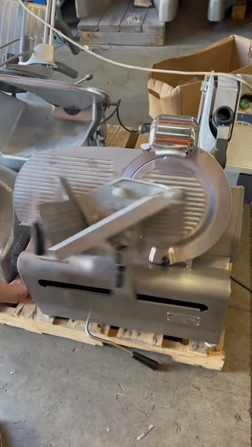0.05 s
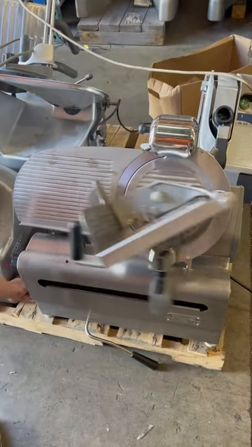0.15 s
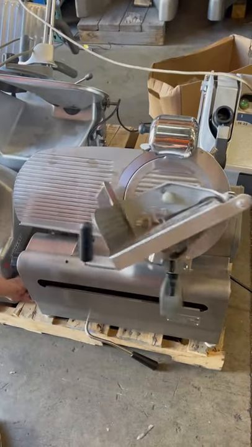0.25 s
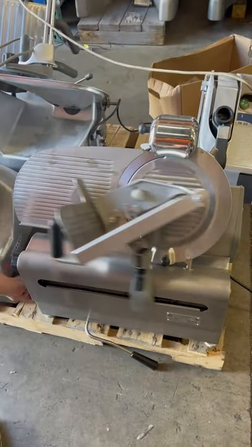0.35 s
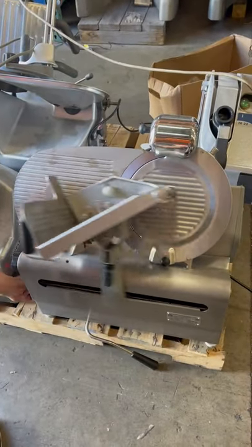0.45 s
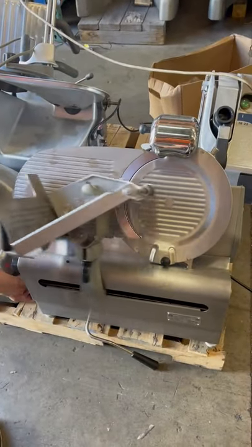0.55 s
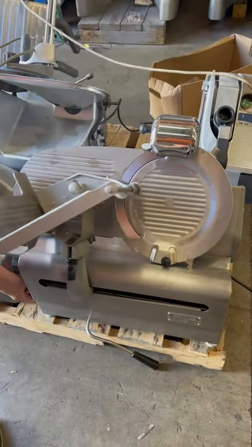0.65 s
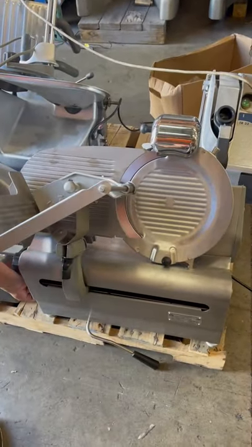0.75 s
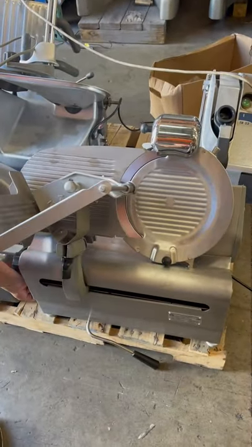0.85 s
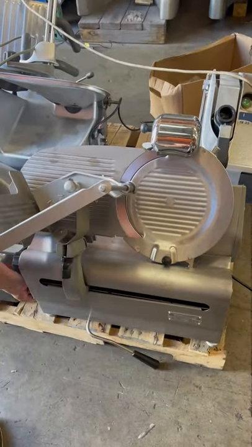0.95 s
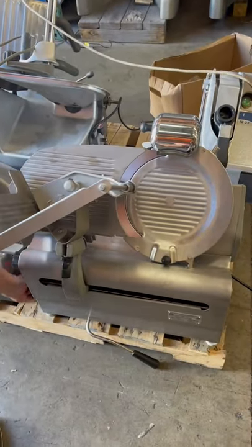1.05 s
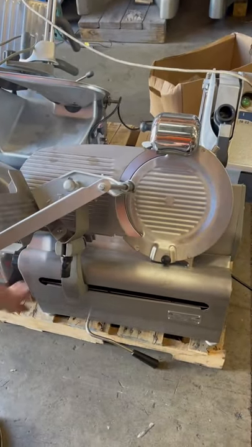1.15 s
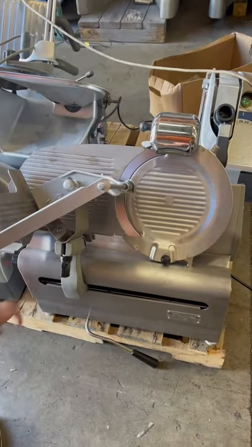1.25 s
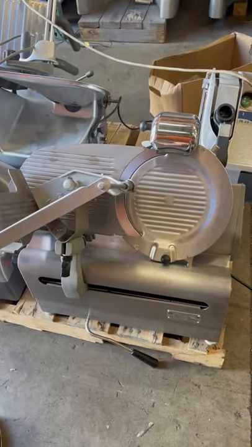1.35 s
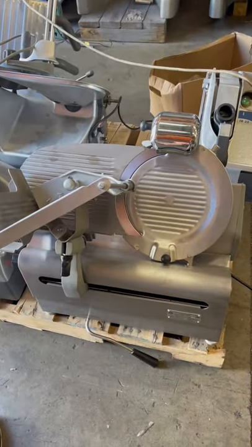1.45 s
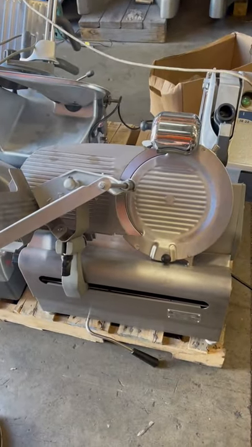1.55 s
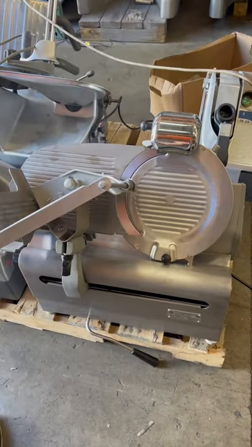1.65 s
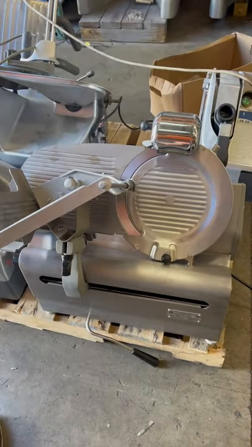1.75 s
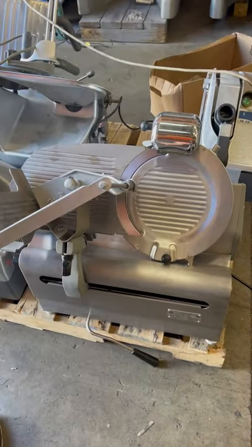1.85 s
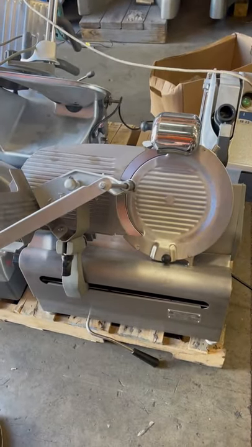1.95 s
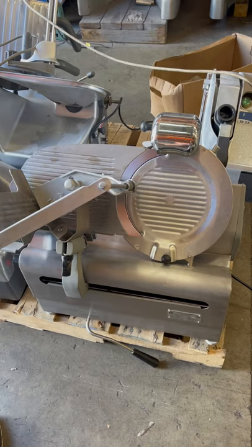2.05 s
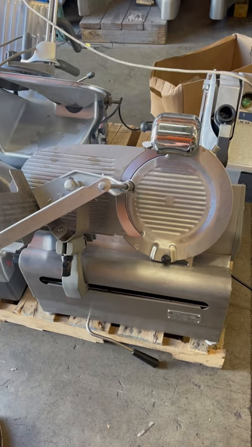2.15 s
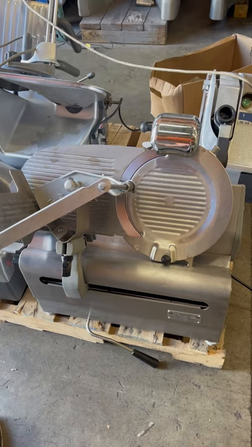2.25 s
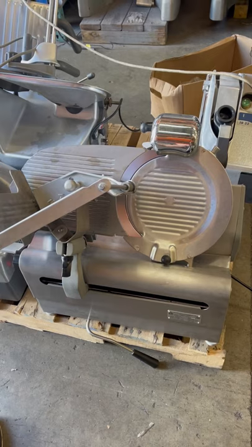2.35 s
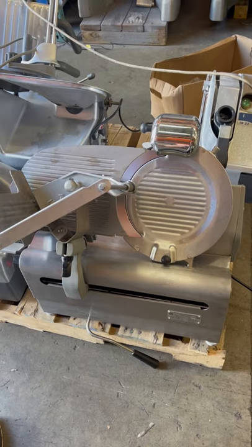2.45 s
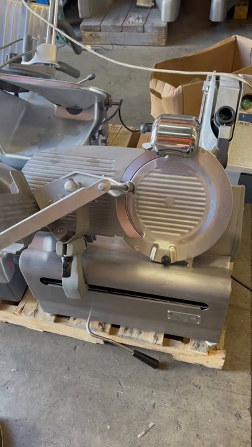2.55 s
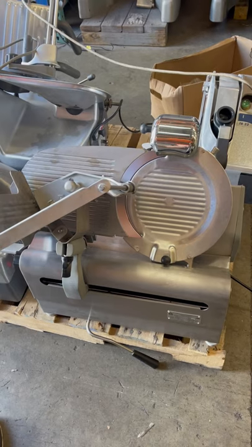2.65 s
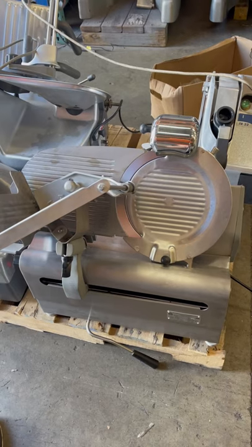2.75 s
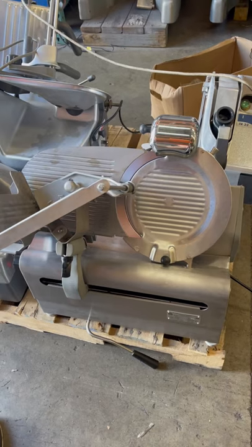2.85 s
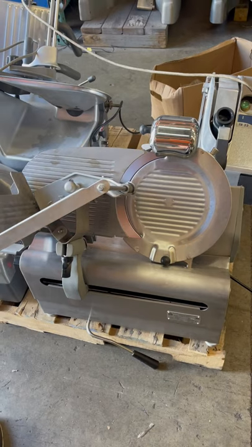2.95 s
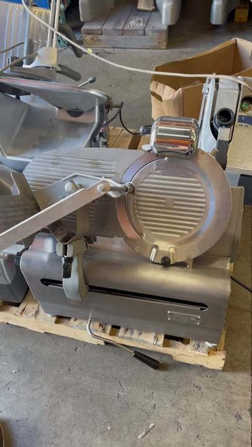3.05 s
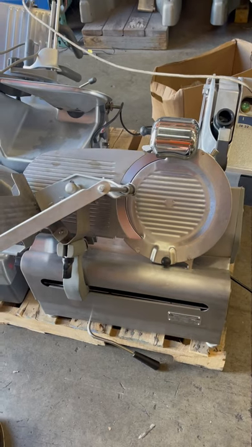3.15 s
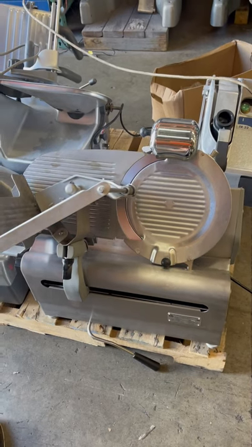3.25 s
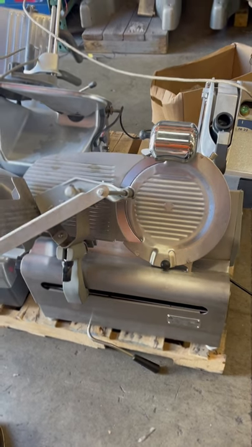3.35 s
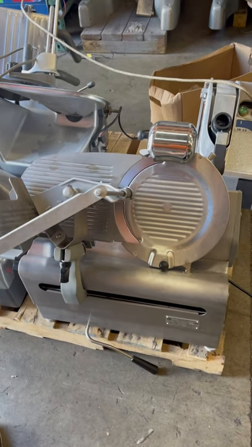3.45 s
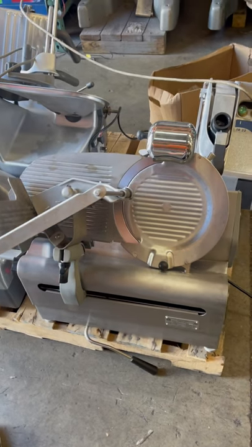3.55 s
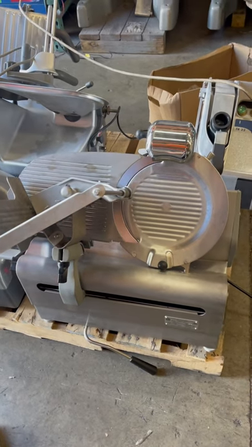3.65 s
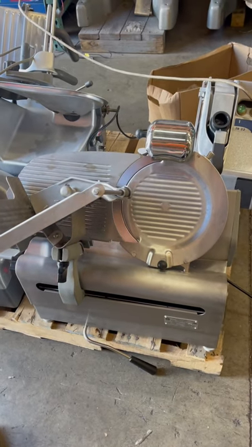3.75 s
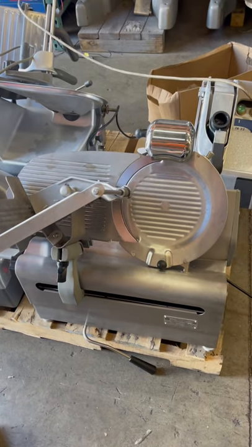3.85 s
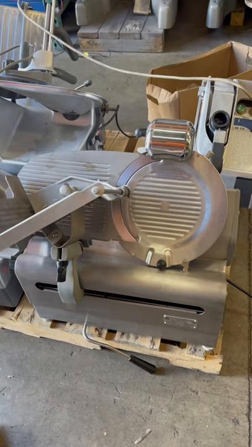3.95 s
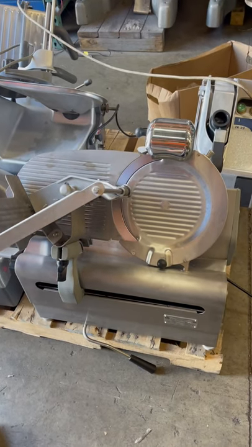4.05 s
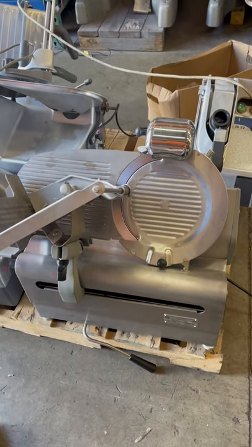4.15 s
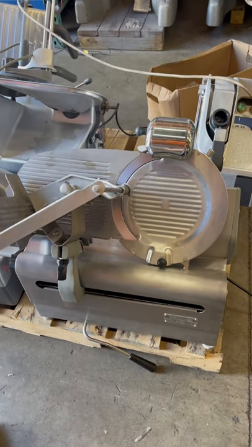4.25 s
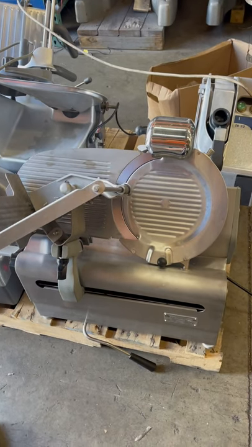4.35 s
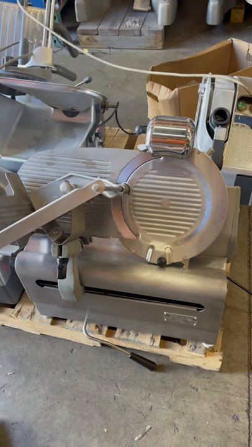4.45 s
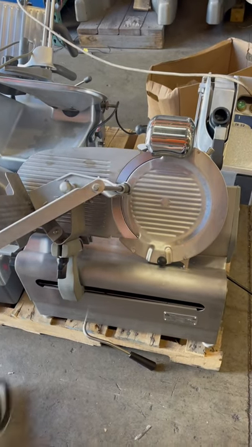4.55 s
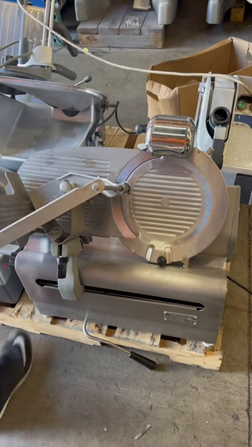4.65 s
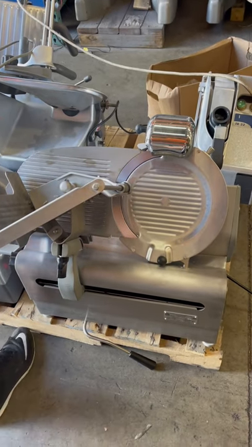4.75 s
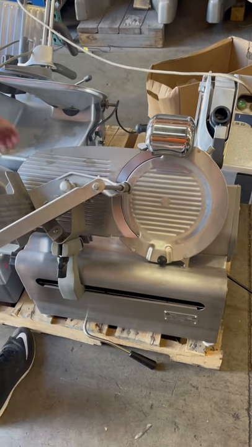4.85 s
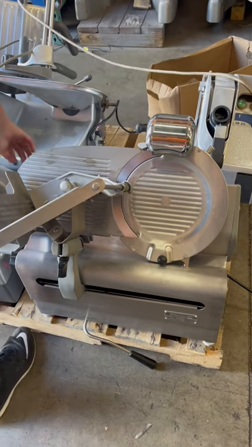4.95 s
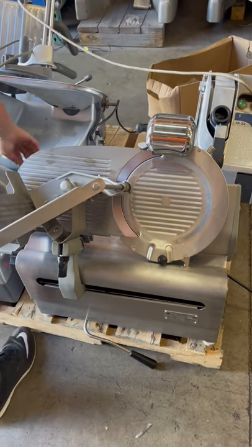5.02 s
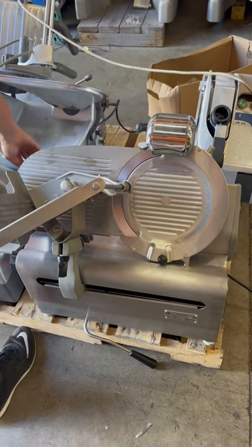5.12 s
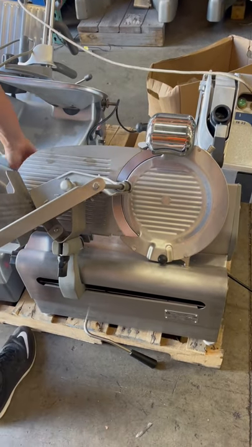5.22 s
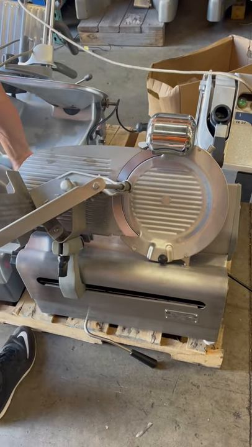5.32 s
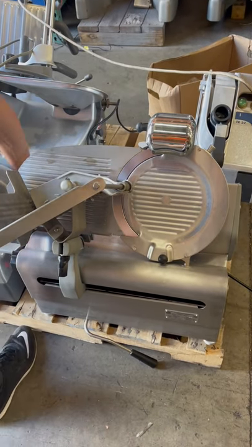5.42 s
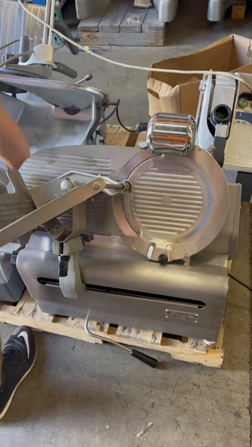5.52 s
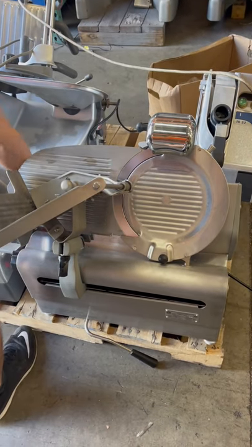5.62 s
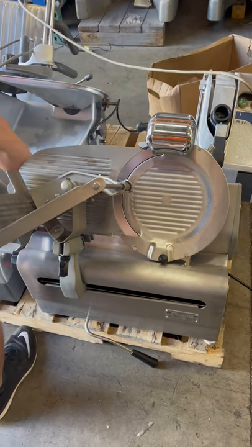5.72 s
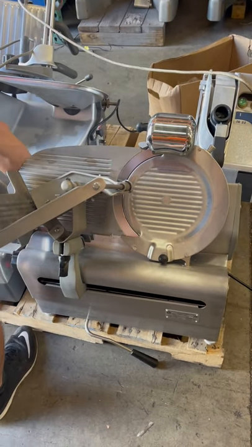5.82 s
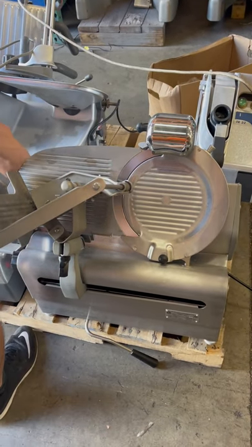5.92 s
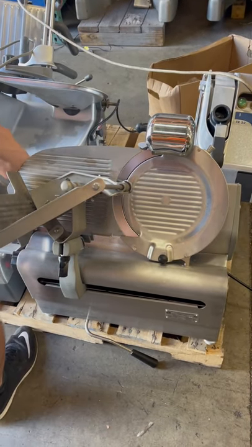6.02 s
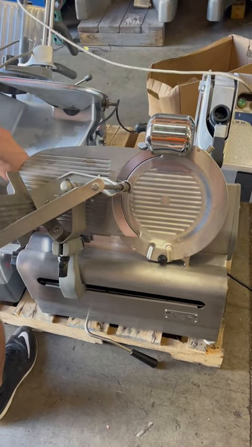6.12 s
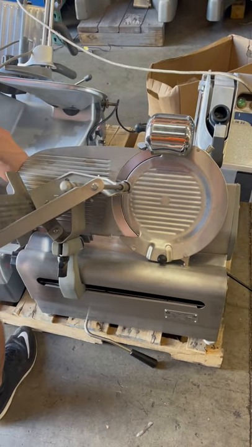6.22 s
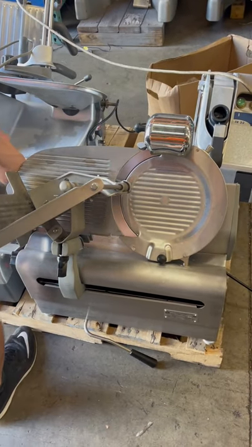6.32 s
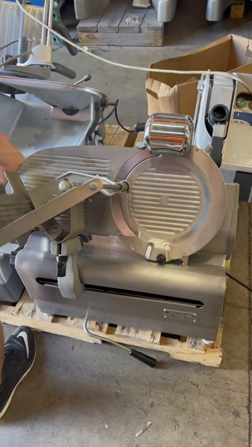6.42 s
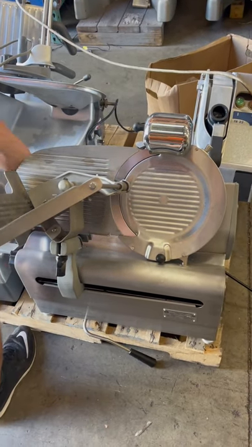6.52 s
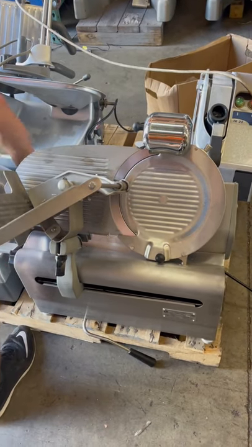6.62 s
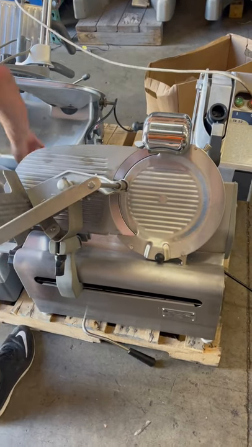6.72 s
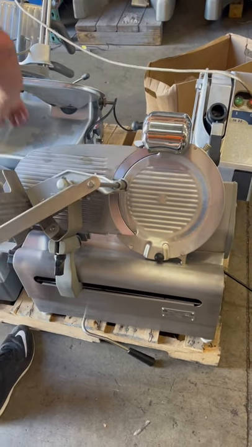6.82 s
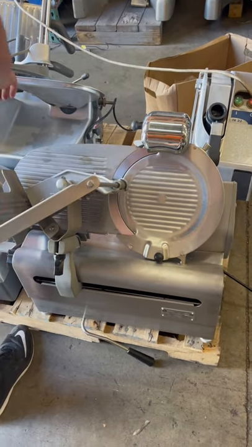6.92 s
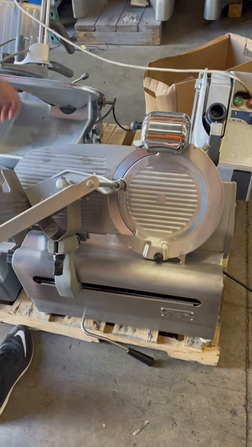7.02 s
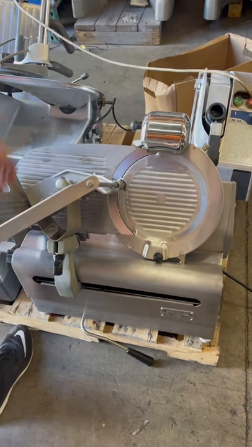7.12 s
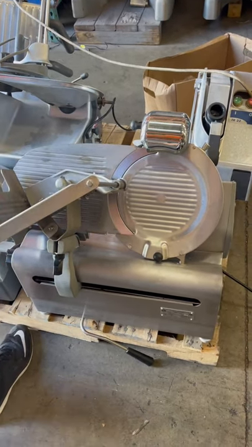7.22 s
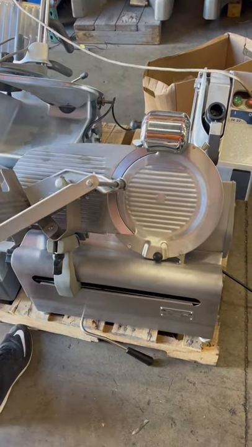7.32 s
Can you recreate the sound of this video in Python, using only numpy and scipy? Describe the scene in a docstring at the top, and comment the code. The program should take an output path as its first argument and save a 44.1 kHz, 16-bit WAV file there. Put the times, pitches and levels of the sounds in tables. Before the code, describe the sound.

Close up in a warehouse, a commercial meat slicer's carriage rattles through its last stroke and slams with a sharp metallic crack and brief shudder. The motor keeps whirring and humming, settling slightly, while the blade's airy hiss gradually thins. Faint ticks come and go. Near the end a shoe scuffs on concrete, a switch clicks, and the whirr dies away over low room rumble. Handheld stereo phone about a metre away.

```python
"""A meat slicer in a warehouse, a metre from a phone. First the carriage rattles home and slams: noise and
knocks ring its modes, and noise bursts crack. All along, the motor whirrs (beating noise in a resonant
casing) and hums (sines) while the blade's hiss (coloured noise) thins out. Near the end a shoe scuffs, then
a switch clicks and the whirr dies away. Ticks and faint tones come and go as the hall rumbles."""
import sys
import numpy as np
from scipy import signal
from scipy.fft import rfft, irfft
from scipy.io import wavfile
from scipy.ndimage import uniform_filter1d

SR = 44100
rng = np.random.default_rng(int(sys.argv[2]) if len(sys.argv) > 2 else 0)


def dump(signal):
    """Clip the signal to [-1, 1] and save it as 16-bit WAV at the path in sys.argv[1]."""
    limited = np.clip(np.atleast_2d(signal).T, -1, 1)
    pcm = np.round(limited * 32767).astype(np.int16)
    wavfile.write(sys.argv[1], SR, pcm)


N = 325458  # samples


def undb(db):
    """Decibel law: amplitude ratio of a level in dB."""
    return 10 ** (np.asarray(db) / 20)


def unit(x):
    """Normalisation to an rms of 1."""
    return x / np.sqrt(np.mean(x ** 2))


def curve(rows):
    """Linear interpolation: the columns of a time table, one value per sample."""
    seconds, *columns = np.transpose(rows)
    return [np.interp(np.arange(N) / SR, seconds, column) for column in columns]


def on_bins(points):
    """Interpolation over log frequency: (Hz, value) points read on the FFT bins."""
    hz, value = np.transpose(points)
    bin_hz = np.arange(N // 2 + 1) * SR / N
    return np.interp(np.log(bin_hz + 1), np.log(hz + 1), value)


def colour(x, points):
    """Spectral shaping: white sound takes the given spectrum, some 40 dB darker beyond it, at rms 1."""
    (low_hz, low_db), (high_hz, high_db) = points[0], points[-1]
    points = [(low_hz / 1.5, low_db - 40)] + list(points) + [(high_hz * 1.5, high_db - 40)]
    return unit(irfft(rfft(x) * undb(on_bins(points)), N))


def ring(x, hz, width):
    """Resonance: a pole pair whose width in Hz sets its decay."""
    radius = np.exp(-np.pi * width / SR)
    return signal.lfilter([1, 0, -1], [1, -2 * radius * np.cos(2 * np.pi * hz / SR), radius ** 2], x)


def walk(rate):
    """Slow random fluctuation: levels held 1 / rate s and smoothed twice."""
    hold = int(SR / rate)
    steps = np.repeat(rng.standard_normal(N // hold + 1), hold)
    return uniform_filter1d(uniform_filter1d(steps, hold), hold)[:N]


def gate(start, end, fade):
    """Linear envelope: rises from start and falls to end, each within the fade in seconds."""
    t = np.arange(N) / SR
    return np.clip((t - start) / fade, 0, 1) * np.clip((end - t) / fade, 0, 1)


OFF_S = 6.18  # the switch opens
BEAT_HZ, BEAT_DEPTH = 39.0, .14
# Whirr level once settled, extra level under load at the start, time constant of settling, fall after the switch
WHIRR_DB, LOAD_DB, SETTLE_S, COAST_DB_PER_S = -39, 5, 1, 8.5
# Colour of the whirr. Each row: frequency in Hz, relative density in dB per Hz.
WHIRR_COLOUR = [(150, -21), (250, 1), (270, -5.5), (338, -3.5), (467, -1.5), (516, 0), (1050, -5),
                (1260, -11), (1490, -13), (1860, -14), (3600, -27), (4680, -54), (7920, -120)]
# Casing modes. Each row: frequency in Hz, width in Hz, rms level in dB relative to the other modes.
CASING_MODES = [(217.3, 5.2, -18), (342, 19, -18.5), (506.6, 3.8, -12.5), (539.8, 6.6, -19.5),
                (577, 3.6, -19), (627, 8.8, -18.5), (717.2, 11, -13.5), (880, 20, -16.5), (1000, 3.1, -40),
                (1230, 36, -11), (1304, 14, -19.5), (1393, 6.8, -26.5), (1615, 35, -25.5),
                (1846, 22, -21.5), (2027, 12, -26.5), (2573, 170, -23.5), (3205, 75, -28), (3380, 27, -33)]


def whirr():
    """Forced vibration: bearing and belt noise, beating once a turn, rings the modes of the casing."""
    t = np.arange(N) / SR
    turn = np.cos(2 * np.pi * BEAT_HZ * t + 1.15 * walk(2.77))
    third_harmonic = 0.59 * np.cos(6 * np.pi * BEAT_HZ * t)
    force = (1 + BEAT_DEPTH * (turn + third_harmonic)) * rng.standard_normal(N)
    modes = np.zeros(N)
    for hz, width, db in CASING_MODES:
        mode = unit(ring(ring(force, hz, width), hz, hz / 2))
        modes += undb(db + 3.1 * walk(4.98)) * mode
    # around the switch-off the rings fade to under half
    modes *= 0.4 + 0.5 * gate(-1, OFF_S + 0.38, 0.6)
    # louder under load, then settled; after the switch opens the level falls steadily
    level_db = WHIRR_DB + LOAD_DB * np.exp(-t / SETTLE_S) - COAST_DB_PER_S * np.maximum(t - OFF_S, 0)
    return undb(level_db + 0.95 * walk(9)) * (undb(-0.5) * colour(force, WHIRR_COLOUR) + modes)


# Colour of the blade's hiss. Each row: frequency in Hz, relative density in dB per Hz.
HISS_COLOUR = [(1200, 6), (2200, 4), (3500, 0), (4550, 1), (4850, 7.5), (5300, 6), (5650, -1.5),
               (7000, -5.5), (9200, -5), (10600, -8.5), (11100, -39), (11500, -53)]
# Fading of the blade's hiss. Each row: time in seconds, rms level in dB.
HISS_LEVELS = [(0, -42), (.6, -42.5), (1.5, -46), (2.05, -46.5), (2.2, -45.5), (2.5, -49), (3.05, -48.5),
               (3.4, -49.5), (4.15, -51), (4.5, -52.5), (5.3, -53), (6.3, -56), (6.8, -58), (7.38, -60)]


def blade():
    """Friction noise: the blade rubs unevenly, so low and high parts of its hiss swell apart."""
    rub = rng.standard_normal(N)
    low = signal.sosfilt(signal.butter(2, 4000., fs=SR, output="sos"), rub)
    high = rub - low
    uneven = low * undb(1.8 * walk(14)) + high * undb(1.8 * walk(12))
    hiss = colour(uneven * undb(0.54 * walk(300)), HISS_COLOUR)
    return undb(curve(HISS_LEVELS)[0]) * hiss


# Magnetic hum. Each row: frequency in Hz, rms level in dB.
HUM_PARTIALS = [(58.0, -44), (119.9, -42), (239.9, -49.5), (360.0, -56.5)]


def hum():
    """Magnetic excitation: the coils hum in wavering sines, silent once the switch opens."""
    t = np.arange(N) / SR
    out = np.zeros(N)
    for hz, db in HUM_PARTIALS:
        sine = np.sqrt(2) * np.sin(2 * np.pi * hz * t + 0.76 * walk(9))
        out += undb(db + 1.96 * walk(13)) * sine
    return out * gate(-1, OFF_S, 0.07)


# Passing tones. Each row: start in seconds, end in seconds, frequency in Hz, phase waver in radians,
# rms level in dB.
PASSING_TONES = [(.68, 1.32, 1886, 2.4, -53.5), (4.206, 5.35, 57.3, 1.4, -37.5),
                 (5.453, 5.85, 233, 4.9, -41), (5.6, 6.3, 321, 9.0, -47), (6.1, 6.7, 340, 10.4, -46),
                 (6.393, 6.723, 157, 1.3, -38.5), (6.756, 7.45, 468.6, 0.4, -45.5),
                 (6.906, 7.45, 158.5, 1.3, -43.5), (6.9, 7.3, 201.6, 1.7, -52)]


def tones():
    """Phase modulation: narrow tones that swell up for a while and waver."""
    t = np.arange(N) / SR
    out = np.zeros(N)
    for start, end, hz, waver, db in PASSING_TONES:
        sine = np.sqrt(2) * np.sin(2 * np.pi * hz * t + waver * walk(12))
        out += undb(db + 2.6 * walk(13)) * gate(start, end, 0.044) * sine
    return out


SLAM_S = .3415
STROKE_FADE_S, SWELL_DB_PER_S = 0.031, 21  # the rattle grows along each stroke
# Carriage strokes. Each row: start in seconds, end in seconds, level of the driving noise at the start in dB.
CARRIAGE_STROKES = [(-.03, 0.144, -43), (0.171, 0.382, -31.5)]
# A hard brief shake after the slam and a longer shudder. Each row: level of the driving noise in dB, T60 in
# seconds.
SLAM_SHAKES = [(-27, 0.19), (-27.5, 1.3)]


def travel():
    """Stochastic excitation: rough noise for the strokes and for the shaking after the slam."""
    t = np.arange(N) / SR
    rattle = np.zeros(N)
    for start, end, db in CARRIAGE_STROKES:
        swell_db = SWELL_DB_PER_S * np.clip(t - start, 0, end - start)
        rattle += undb(db + swell_db) * gate(start, end, STROKE_FADE_S)
    since = np.maximum(t - SLAM_S, 0)
    shakes = sum(undb(db - 60 * since / t60) for db, t60 in SLAM_SHAKES)
    rattle += gate(SLAM_S, 9, 0.0094) * shakes
    return rattle * undb(3.1 * walk(120.) + 3.4 * walk(30.4)) * rng.standard_normal(N)


CHATTER_T60_S = 0.037
# Carriage modes. Each row: frequency in Hz, relative level in dB, T60 in seconds.
CARRIAGE_MODES = [(167, -14, 0.094), (234.4, -3, 0.1), (356, -1, 0.077), (462, -10, 0.11), (582, -8, 0.12),
                  (693, -4.5, 0.06), (883, -3, 0.039), (1015, -3.5, 0.03), (1223, -9.5, 0.04),
                  (1366, -10.5, 0.082), (1540, -11.5, 0.08), (1740, -11.5, 0.091), (1888, -8.5, 0.12),
                  (2125, -14, 0.13), (2560, -21, .08), (2900, -23, 0.17), (3400, -29, 0.15),
                  (3680, -13, 0.088), (4226, -24, 0.18), (5800, -16, .14), (6300, -15, 0.17)]
# Carriage knocks. Each row: time in seconds, relative strength in dB, pitch in Hz near which modes ring most.
CARRIAGE_KNOCKS = [(.012, -24, 467), (0.062, -21, 800), (.076, -22.5, 700), (0.091, -20, 227),
                   (.112, -23, 300), (.126, -25, 200), (0.184, -20.5, 895), (.195, -17.5, 230),
                   (.208, -28.5, 1700), (0.224, -27, 1500), (.24, -27, 750), (.242, -17, 242),
                   (.285, -19.5, 260), (0.3, -23, 380), (.318, -21.5, 300), (.332, -15, 900),
                   (0.343, -12, 1780), (.346, -15, 5500), (0.354, -15.5, 1420), (.36, -21, 800),
                   (.366, -12, 2900), (.363, -18, 1700), (.38, -16, 650), (.398, -24, 2100),
                   (.415, -25, 905)]


def carriage():
    """Modal excitation: travel and knocks ring the same modes; each blow's spot favours other modes."""
    rough = travel()
    at_s, strength_db, spot_hz = np.transpose(CARRIAGE_KNOCKS)
    length = SR // 20
    chatter_fade = undb(-60 * np.arange(length) / SR / CHATTER_T60_S)
    impulse = np.eye(1, length)[0]
    out = np.zeros(N)
    for hz, mode_db, t60 in CARRIAGE_MODES:
        width = np.log(1000) / np.pi / t60
        blow_db = strength_db - 17.0 * np.log2(hz / spot_hz) ** 2 + 2.8 * rng.standard_normal(len(at_s))
        blows = np.zeros(N)
        blows[(at_s * SR).astype(int)] += undb(blow_db) * rng.choice([-1, 1], len(at_s))
        # loose parts chatter, so each blow is a short cluster, as strong in this mode as one impulse
        chatter = rng.standard_normal(length) * chatter_fade
        chatter *= np.linalg.norm(ring(impulse, hz, width)) / np.linalg.norm(ring(chatter, hz, width))
        blows = signal.fftconvolve(blows, chatter)[:N]
        # the travel is a soft push that favours the low modes
        push = rough * np.sqrt(width / SR) / (1 + (hz / 2500.0) ** 2)
        # no blow is sharp enough to click
        soft = signal.butter(2, min(2 * hz, 9000), fs=SR, output="sos")
        out += undb(mode_db) * signal.sosfilt(soft, ring(blows / 2 + push, hz, width))
    # loose parts scrape along
    scrape_band = signal.butter(2, [300., 2600.], "band", fs=SR, output="sos")
    return out + undb(-8.0) * signal.sosfilt(scrape_band, rough)


def burst(s, db, hz, width, attack, t60):
    """Transient noise: a band with a quick rise, a snap and an exponential tail."""
    t = np.maximum(np.arange(N) / SR - s, 0)
    tail = undb(-60 * np.maximum(t - attack, 0) / t60)
    snap = np.exp(-t / 0.00067)
    shape = np.minimum(t / attack, 1) * (tail + snap)
    edges = [max(hz - width / 2, 100), min(hz + width / 2, 13000)]
    band = signal.butter(2, edges, "band", fs=SR, output="sos")
    noise = unit(signal.sosfilt(band, rng.standard_normal(N)))
    return undb(db + 3.2 * walk(250)) * shape * noise


# Bands of the slam's crack. Each row: centre in Hz, width in Hz, rms level before the envelope in dB,
# attack in seconds, T60 in seconds.
SLAM_BANDS = [(7400, 4600, -25, 0.0034, 0.25), (9180, 980, -6.5, 0.007, 0.067),
              (6350, 1300, -17, 0.0081, 0.031), (1830, 3300, -18, 0.0079, 0.19),
              (4050, 6300, -41.5, 0.022, 1)]


def slam():
    """Impact noise: the crack of the slam as bands that die at their own rates."""
    return sum(burst(SLAM_S, db, hz, width, attack, t60) for hz, width, db, attack, t60 in SLAM_BANDS)


TICK_ATTACK_S = 0.0018
# Small ticks and thuds. Each row: time in seconds, rms level before the envelope in dB, centre in Hz,
# width in Hz, T60 in seconds.
TICK_BURSTS = [(0.18, -33, 5000, 9000, 0.08), (1.344, -42, 6500, 11000, 0.19),
               (3.497, -52, 6000, 5000, .05), (3.77, -52, 8500, 7000, 0.16), (4.647, -46, 9100, 8000, 0.2),
               (5.176, -35, 690, 497, .016), (6.2028, -37.5, 9100, 8500, 0.13),
               (6.204, -48, 2600, 2500, .05), (6.3943, -40, 4600, 5200, 0.016),
               (6.396, -50, 6000, 9000, 0.18), (6.985, -34, 202, 120, 0.2), (7.117, -47, 5500, 8500, 0.2),
               (7.165, -52, 4500, 6000, 0.11)]


def ticks():
    """Impact noise: small ticks and thuds, the switch's click among them, as short bursts."""
    return sum(burst(s, db, hz, width, TICK_ATTACK_S, t60) for s, db, hz, width, t60 in TICK_BURSTS)


# Middle of the scuff, its peak level, time from the middle to 20 dB down
SCUFF_S, SCUFF_DB, SCUFF_HALF_S = 5.48, -40, 0.1
# Colour of the sole. Each row: frequency in Hz, relative density in dB per Hz.
SOLE_COLOUR = [(900, -13), (2200, 0), (4000, -7.5), (6500, -1.5), (9000, 0), (11000, -6), (12200, -5),
               (12600, -50)]


def scuff():
    """Sliding friction: a rubber sole drags over concrete as a swell of coloured noise."""
    away = (np.arange(N) / SR - SCUFF_S) / SCUFF_HALF_S
    level_db = SCUFF_DB - 20 * np.abs(away) ** 2.6 + 1.7 * walk(67)
    return undb(level_db) * colour(rng.standard_normal(N), SOLE_COLOUR)


AIR_DB = -50  # rms level of the steady air hiss
# Swelling of the hall. Each row: time in seconds, level of the deep rumble in dB, level of the low drone in dB.
HALL_LEVELS = [(0, -35, -37), (.43, -43, -39), (.84, -37.5, -40.5), (2.24, -37, -44.5), (3.55, -43, -38.5),
               (4.3, -37.5, -40.5), (5.2, -38.5, -38.5), (5.7, -37, -36.5), (6.56, -38.5, -33.5),
               (6.8, -36, -37), (7.03, -36, -33.5), (7.38, -39, -35.5)]
# Colours of rumble, drone and air hiss. Each row: frequency in Hz, relative density in dB per Hz.
RUMBLE_COLOUR = [(13, -53), (22, -28), (30, -20), (43, -6), (68, 5), (79, -2), (92, 0.5), (110, -10),
                 (140, -35), (240, -120)]
DRONE_COLOUR = [(65, -9), (110, -1), (140, 0.5), (161, 3), (231, 2.5), (280, -6), (329, -2.5), (440, -12.5),
                (570, -12), (970, -120)]
AIR_COLOUR = [(400, -23), (700, 16), (1500, -20), (5500, -22.5), (9500, -4.5), (11000, -19), (11400, -33)]


def hall():
    """Ambient noise: the building's deep rumble and low drone swell and sink under a steady air hiss."""
    deep_db, drone_db = curve(HALL_LEVELS)
    deep = undb(deep_db + 0.93 * walk(14)) * colour(rng.standard_normal(N), RUMBLE_COLOUR)
    drone = undb(drone_db + 1.1 * walk(12)) * colour(rng.standard_normal(N), DRONE_COLOUR)
    air = undb(AIR_DB) * colour(rng.standard_normal(N), AIR_COLOUR)
    return deep + drone + air


WALL_T60_S, SWAY_RAD = 0.11, 4
# Reflections that differ between the ports. Each row: frequency in Hz, gain in dB.
REFLECTION_GAIN = [(60, -65), (130, -42), (260, -20), (550, -11), (900, -4), (1300, -9), (1850, -18.5),
                   (2900, -5), (4600, -5.5), (6000, -20), (7000, -3.5), (8200, -12.5), (9100, -70),
                   (11000, -8)]


def reflections(direct):
    """Diffuse reflection: nearby surfaces send back a short tail of decaying noise."""
    t = np.arange(SR // 2) / SR
    echo = rng.standard_normal(len(t)) * undb(-60 * t / WALL_T60_S)
    echo /= np.sqrt(np.sum(echo ** 2))
    side = irfft(rfft(direct) * rfft(echo, N) * undb(on_bins(REFLECTION_GAIN)), N)
    # the hand-held phone sways, which turns the phase
    return np.real(signal.hilbert(side) * np.exp(1j * SWAY_RAD * walk(6)))


def scene():
    """Superposition: all sources add up, with the reflections opposite at the two ports."""
    slicer = whirr() + blade() + hum() + tones() + carriage() + slam()
    direct = slicer + ticks() + scuff() + hall()
    side = reflections(direct)
    return np.array([direct + side, direct - side])


TOP_HZ = 14700
# Phase between the ports. Each row: frequency in Hz, lead of the left port in radians.
PORT_LEAD = [(0, 0), (520, 0), (860, .2), (1200, -.15), (1900, .13), (2600, .45), (3300, .95), (4000, .85),
             (4300, 1.2), (4650, 2.3), (5000, 3.75), (5350, 5.2), (5700, 6.1), (6050, 6.3), (7400, 7.9),
             (8800, 9.36), (9450, 9.55), (11500, 11.7), (11900, 12.5), (14000, 12.6)]
# Treble of the microphone. Each row: frequency in Hz, gain in dB.
MIC_TREBLE = [(9500, 0.5), (10800, 5.5), (11500, -4), (12300, -16), (13500, -36), (14700, -40)]


def record(dry):
    """Transduction: ports differ in phase; the microphone tilts treble, rounds peaks and cuts the top."""
    half_turn = np.exp(.5j * on_bins(PORT_LEAD))
    mic = undb(on_bins(MIC_TREBLE))
    left = irfft(rfft(dry[0]) * mic * half_turn, N)
    right = irfft(rfft(dry[1]) * mic / half_turn, N)
    rounded = .85 * np.tanh(np.array([left, right]) / .85)
    return signal.sosfilt(signal.ellip(8, .2, 70, TOP_HZ, fs=SR, output="sos"), rounded)


dry = scene()
out = record(dry)
dump(out)
```